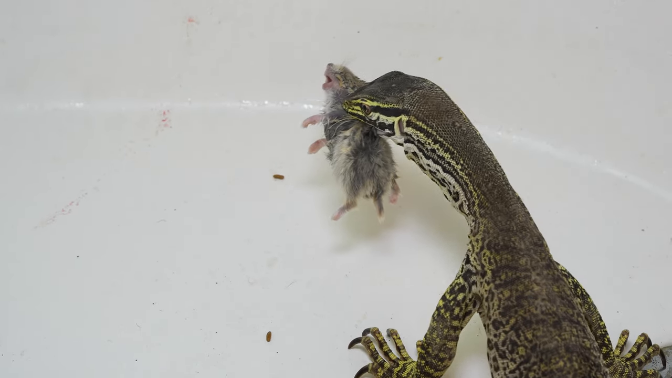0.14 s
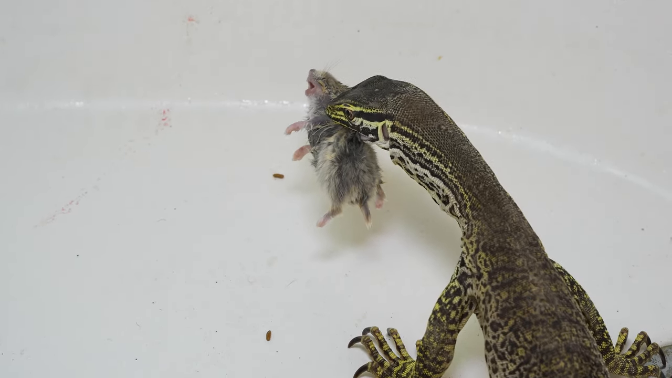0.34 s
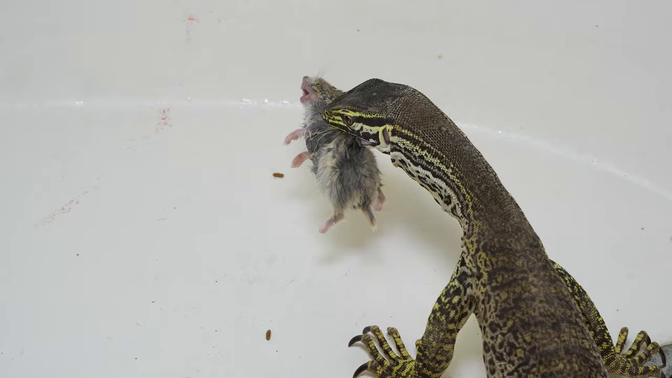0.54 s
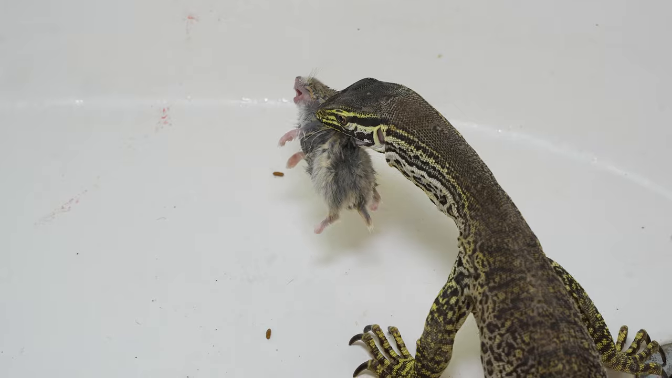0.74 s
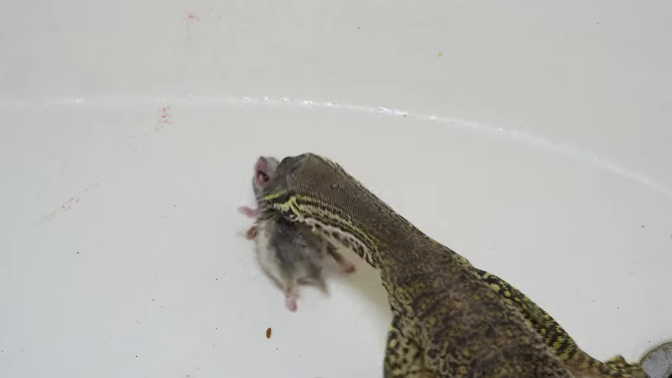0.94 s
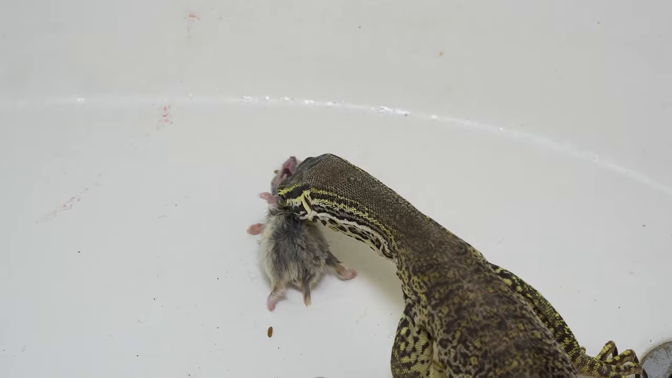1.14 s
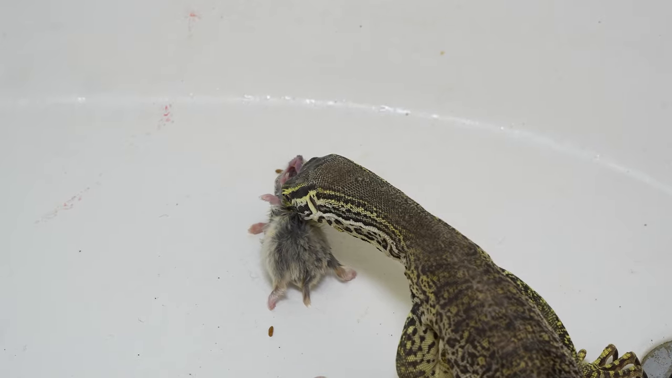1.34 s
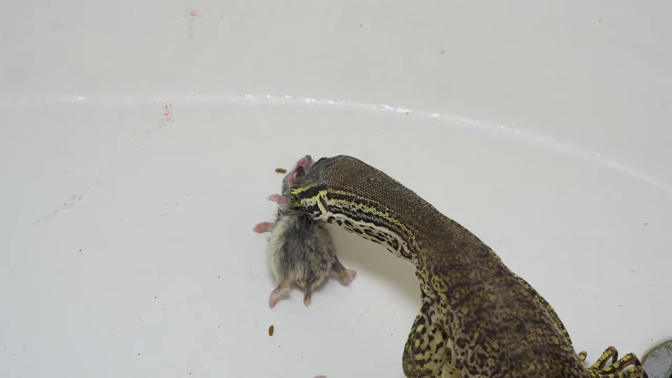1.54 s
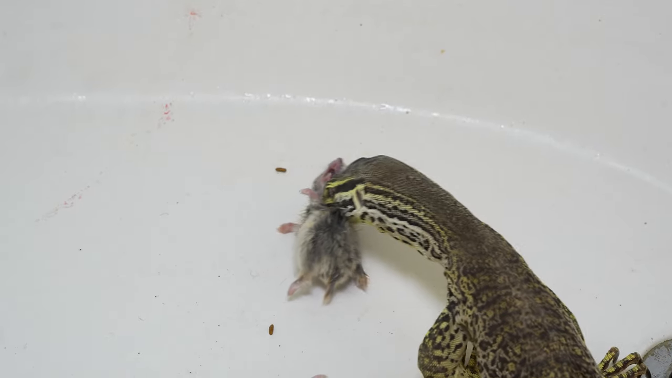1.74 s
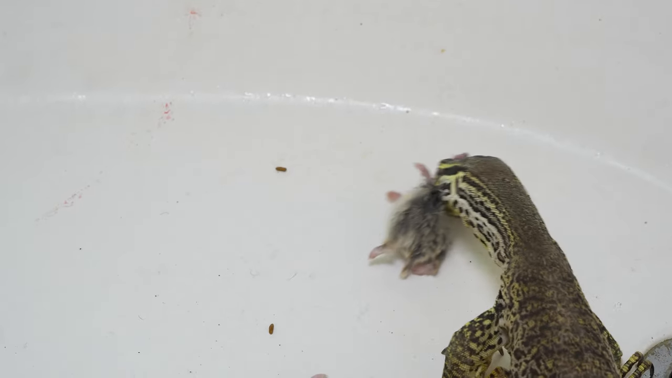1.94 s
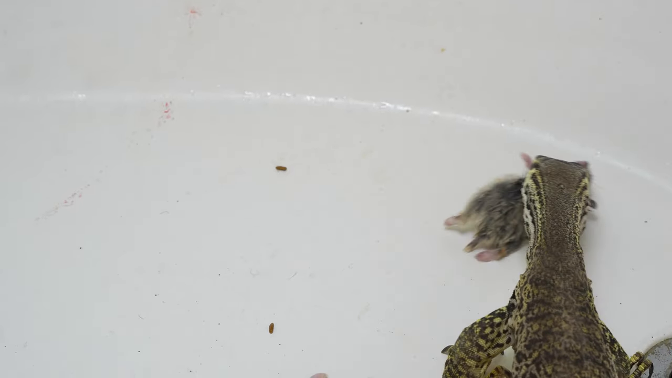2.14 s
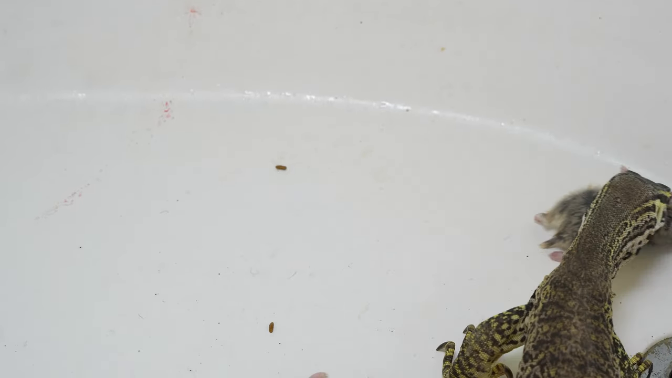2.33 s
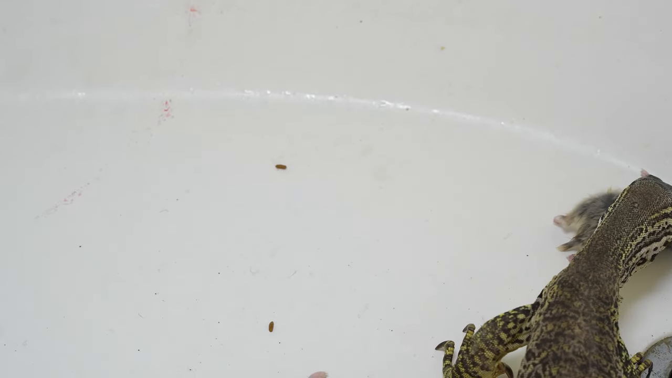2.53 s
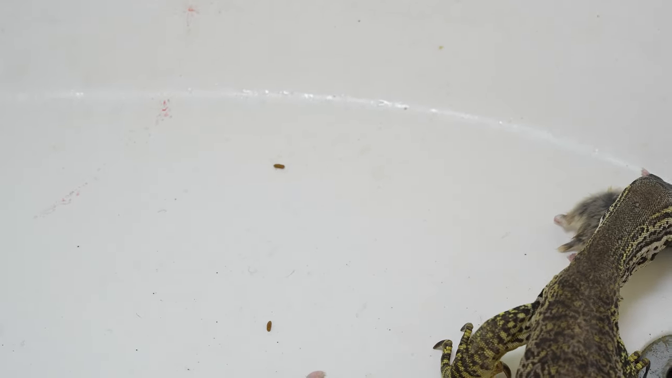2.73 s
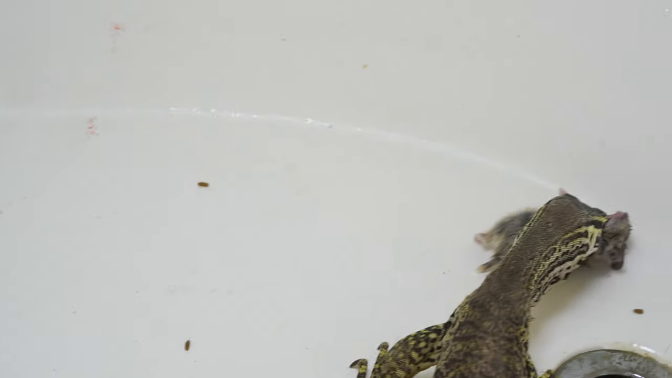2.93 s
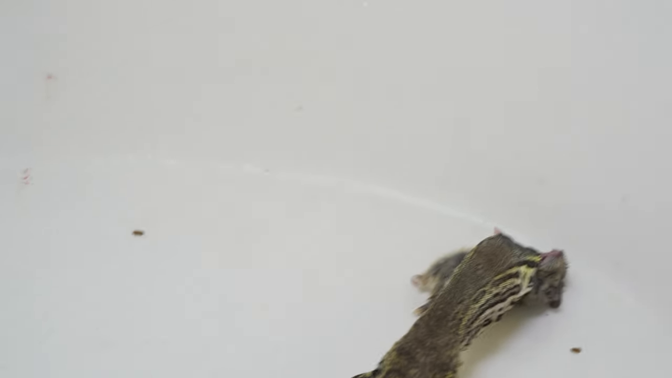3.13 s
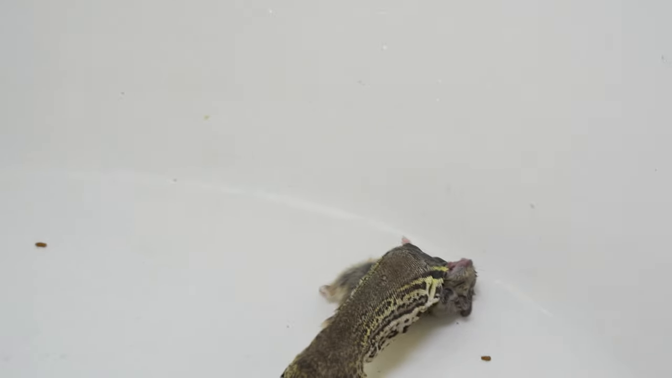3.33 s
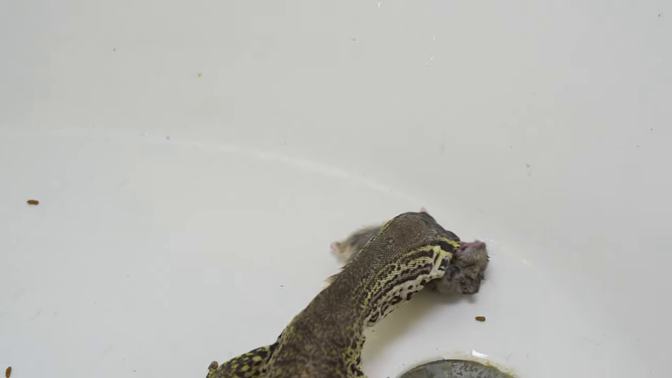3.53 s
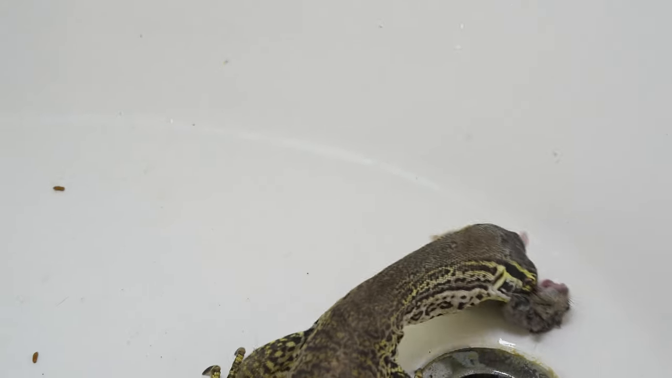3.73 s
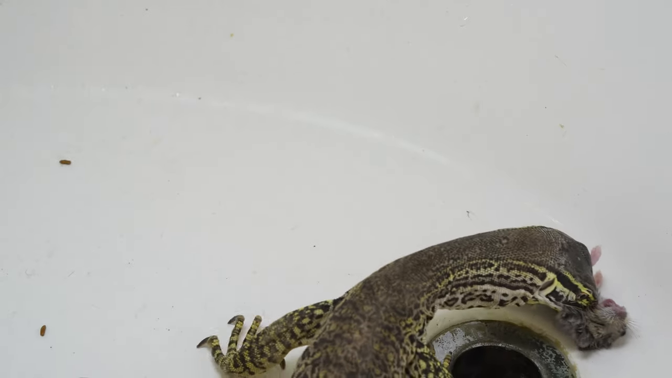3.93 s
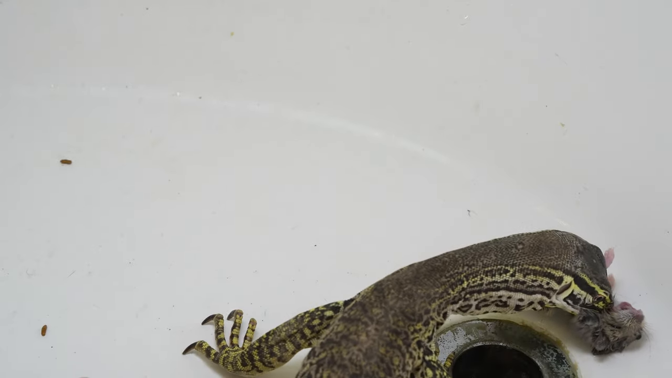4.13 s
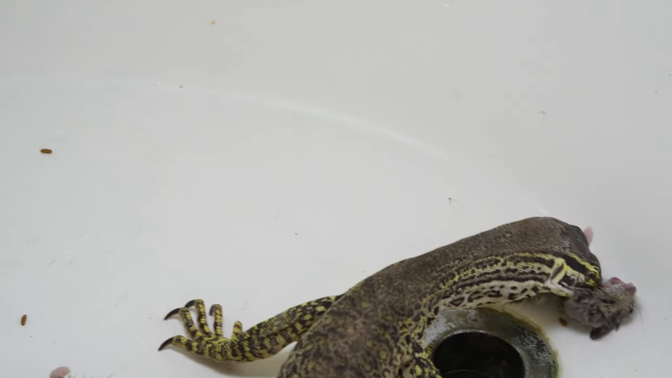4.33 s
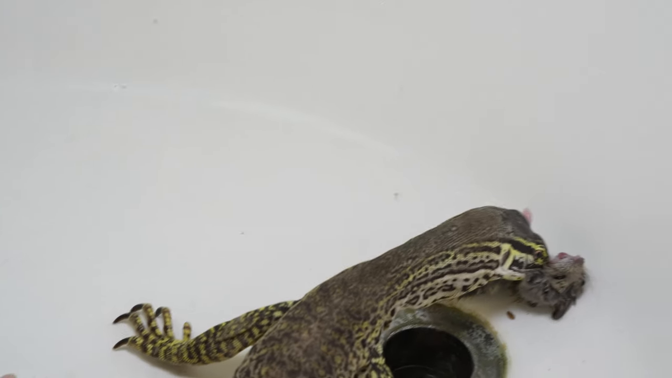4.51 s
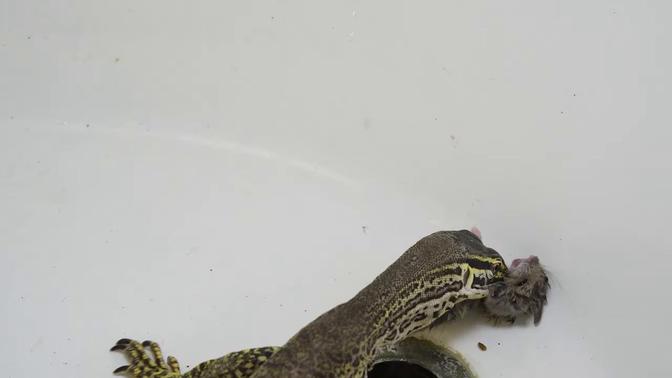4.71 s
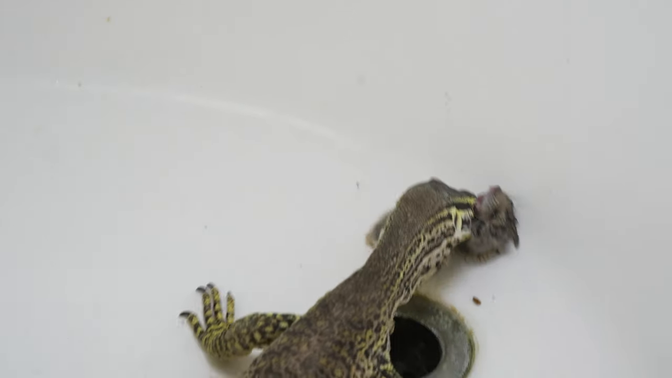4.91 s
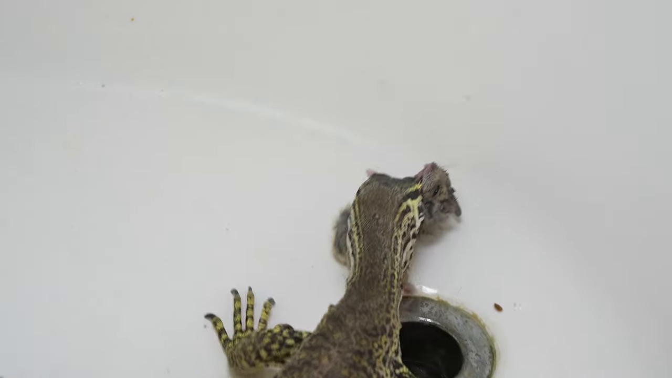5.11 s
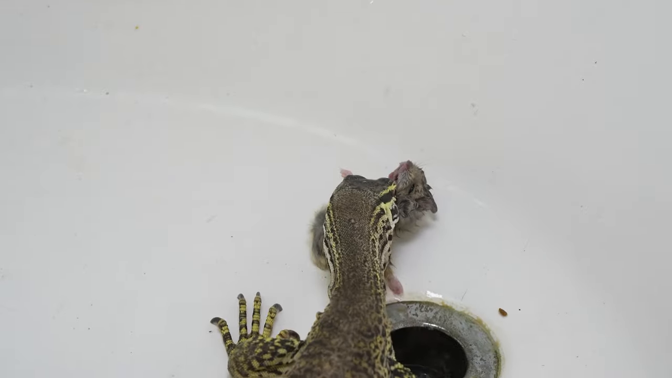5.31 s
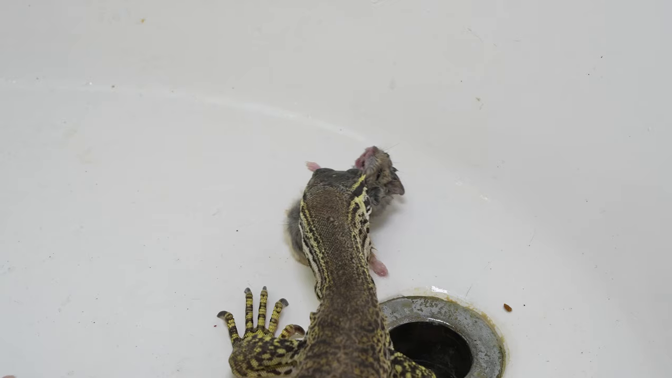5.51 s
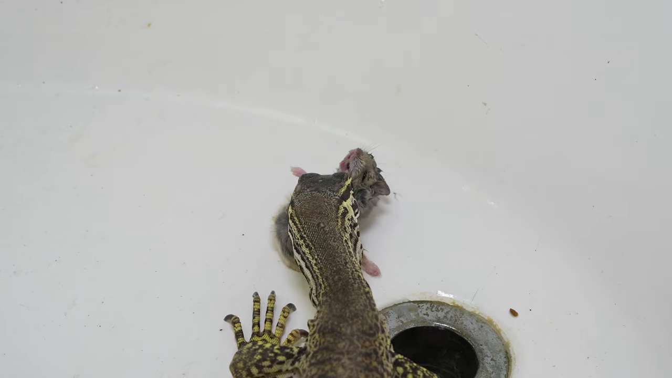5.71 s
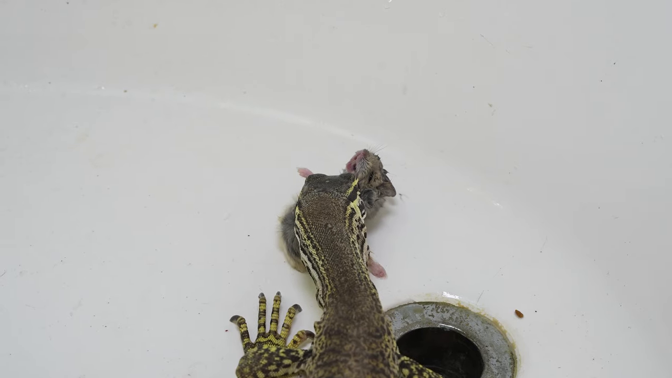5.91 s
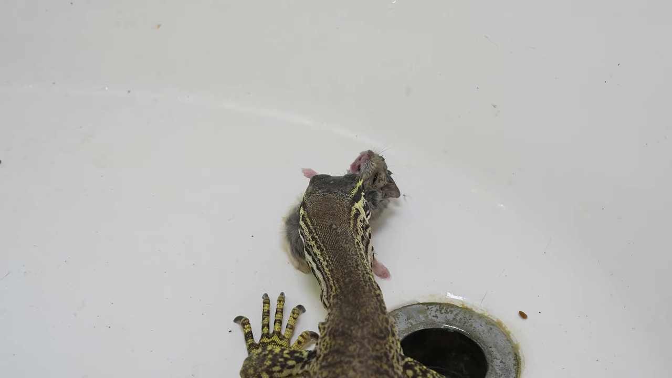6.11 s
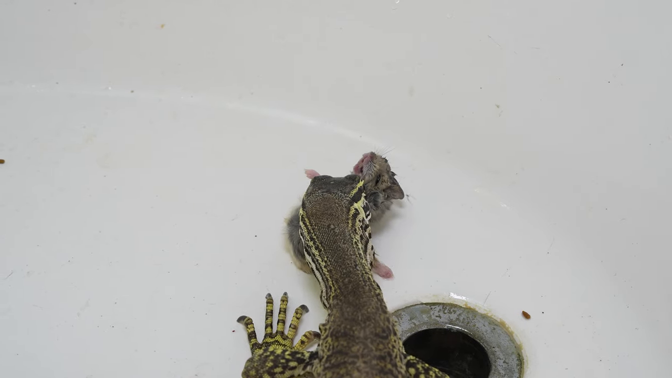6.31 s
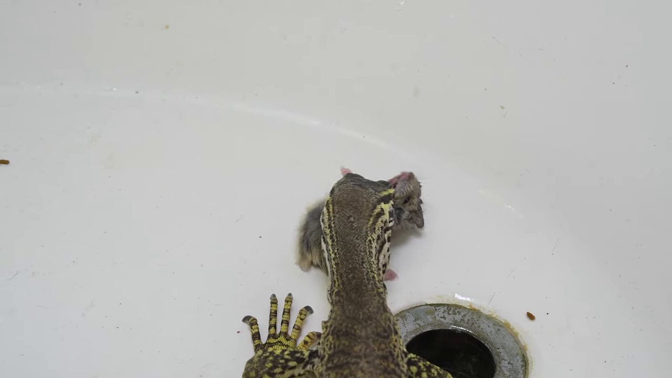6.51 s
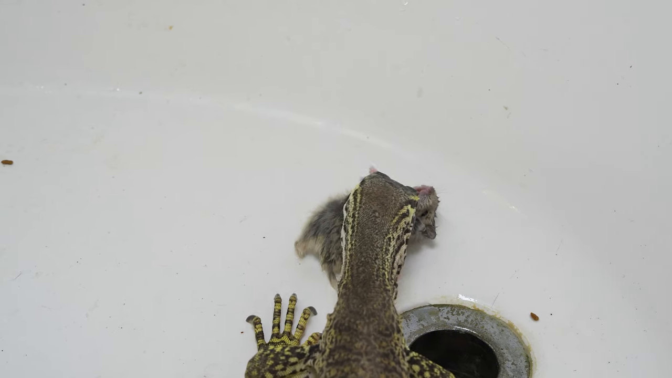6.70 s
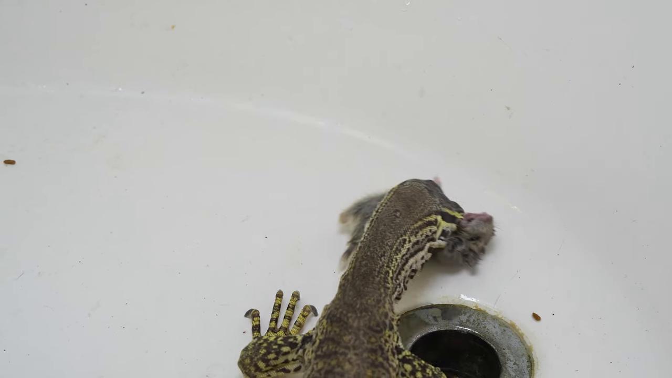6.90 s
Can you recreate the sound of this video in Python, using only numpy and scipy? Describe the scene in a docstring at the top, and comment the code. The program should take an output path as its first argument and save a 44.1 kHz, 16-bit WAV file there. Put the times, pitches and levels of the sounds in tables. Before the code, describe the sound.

A large lizard moves in an empty bathtub, close to the microphone, with the short reverberation of a small hard room and faint low room noise. It begins with a few soft taps. Around 0.9 seconds a foot skids on the enamel, with a sharp claw snap and a dull thud. Another snap comes at 1.9 seconds. Faint taps and light rubbing of scales follow. At 3.8 seconds the body knocks the tub with a hard clack and a hollow boom, by far the loudest event. From 3.9 to 4.3 seconds claws catch on the metal drain in several bright, briefly ringing ticks. The belly then slides along the floor until about 5.3 seconds, hissing and rumbling, with a stronger shove at 4.6, a faint metallic scrape, and a sharp click at 4.9. Only faint taps and rubbing remain until the end, at about 7 seconds.

```python
"""Lizard in an empty bathtub

A large lizard with prey in its jaws shifts about, close to the microphone. Stick-slip friction makes
its feet skid and snap on the enamel and its belly hiss along the floor. Impacts excite resonances:
its body knocks the shell of the tub into booming, and its claws ring the metal drain.
The tub walls and a small hard room reverberate, over faint room noise."""
import sys
import numpy as np
from scipy import signal
from scipy.fft import rfft, irfft, next_fast_len
from scipy.io import wavfile

SR = 44100
rng = np.random.default_rng(int(sys.argv[2]) if len(sys.argv) > 2 else 0)


def log_audio(samples):
    """Write samples as a 16-bit WAV file to the path given in sys.argv[1]."""
    # one column per channel
    frames = np.atleast_2d(samples).T
    # limit to full scale, then quantise
    limited = np.clip(frames, -1, 1)
    pcm = np.round(limited * 32767).astype(np.int16)
    wavfile.write(sys.argv[1], SR, pcm)


N = 311065
T = np.arange(int(.7 * SR)) / SR  # time axis of one impact [s]


def amp(db):
    return 10 ** (np.asarray(db) / 20)


def unit(x):
    return x / np.sqrt(np.mean(x ** 2) + 1e-20)


def add(track, s, x):
    """Superposition: x joins the track from time s on."""
    start = round(s * SR)
    track[start:start + len(x)] += x[:N - start]


def fade(t60):
    """Exponential damping by 60 dB in t60 seconds."""
    return np.exp(-np.log(1000) * T / max(t60, 1e-4))


def stroke(s, hold, db, rise, release):
    """Exponential growth until time s, a hold, then decay; rise and release are seconds per 60 dB."""
    t = np.arange(N) / SR - s
    below = np.maximum(-t, 0) / max(rise, 1e-3) + np.maximum(t - hold, 0) / max(release, 1e-3)
    return amp(db) * np.exp(-np.log(1000) * below)


def swell(s, length, db):
    """Flattened half-sine envelope of a move that gathers speed and comes to rest."""
    progress = np.clip((np.arange(N) / SR - s) / length, 0, 1)
    return amp(db) * np.abs(np.sin(np.pi * progress)) ** 0.59


def filtered(x, response):
    """Linear filtering: the spectrum of x times a complex frequency response."""
    size = 2 * next_fast_len(len(x) // 2 + 8192)
    return irfft(rfft(x, size) * response(np.fft.rfftfreq(size, 1 / SR)), size)[:len(x)]


def shaped(drive, response):
    """Filtering at constant energy."""
    x = filtered(drive, response)
    return x * np.linalg.norm(drive) / np.linalg.norm(x)


def colour(points):
    """Minimum-phase response through points of (frequency [Hz], gain [dB])."""
    def response(hz):
        point_hz, db = np.transpose(points)
        gain = amp(np.interp(np.log(hz + 1), np.log(point_hz), db))
        cepstrum = irfft(np.log(gain))
        half = len(cepstrum) // 2
        return np.exp(rfft(np.r_[cepstrum[0], 2 * cepstrum[1:half], np.zeros(half)]))
    return response


def resonances(peaks):
    """Damped resonators in parallel, each (frequency [Hz], bandwidth [Hz], gain [dB])."""
    return lambda hz: sum(amp(db) * 1j * hz * width / (centre ** 2 - hz ** 2 + 1j * hz * width)
                          for centre, width, db in peaks)


def burst(t60):
    """Broadband excitation by a dying cluster of tiny slips."""
    return .5 * rng.standard_normal(len(T)) * fade(t60)


def friction(rate, smooth):
    """Stick-slip friction: random catches, rate times a second, over a smooth rub; rms 1."""
    catches = rng.standard_normal(N) * (rng.random(N) < rate / SR)
    return unit(unit(catches) + smooth * rng.standard_normal(N))


def diffuse(drive, walls_db, room_db):
    """Diffuse reverberation as noise that trails the drive's power: the tub briefly, the room longer."""
    walls = (fade(.07) * (1 - np.exp(-T / 0.0016))) ** 2
    room = (fade(.44) * (1 - np.exp(-T / 0.021))) ** 2
    energy_response = amp(walls_db) ** 2 * walls / walls.sum() + amp(room_db) ** 2 * room / room.sum()
    power = np.abs(signal.fftconvolve(drive ** 2, energy_response)[:len(drive)])
    return drive + np.sqrt(power) * rng.standard_normal(len(drive))


# spectrum of the room's background: (frequency [Hz], gain [dB])
ROOM_SPECTRUM = [(15, -41), (25, -3), (75, -9), (233, -3.5), (281, -8), (322, -2), (389, -6.5), (648, -11),
                 (1110, -17), (1340, -18.5), (4870, -25), (15500, -30.5)]
def room_noise():
    """Stationary noise, faint and strongest in the bass."""
    return amp(-66.5) * unit(filtered(rng.standard_normal(N), colour(ROOM_SPECTRUM)))


# small contacts of scales and jaws: (time [s], level [dB])
CLICKS = [(0.0268, -56), (0.8, -54), (4.2303, -37.5), (4.901, -28), (6.7149, -50.5)]
# their spectrum: (frequency [Hz], gain [dB])
CLICK_SPECTRUM = [(300, -20), (1800, 1), (2800, -2), (4400, 6), (6500, -9.5), (15000, -49)]
def clicks():
    """Brief, light contacts radiate mostly treble; fainter ones fall at random times."""
    out = np.zeros(N)
    for s, db in CLICKS:
        add(out, s, amp(db) * diffuse(burst(t60=0.0094), walls_db=1, room_db=1))
    faint_per_s = .8
    onsets = 1. * (rng.random(N) < faint_per_s / SR)
    faint = signal.fftconvolve(onsets, burst(t60=0.016))[:N]
    out += amp(-59) * diffuse(faint, walls_db=-8, room_db=-2)
    return shaped(out, colour(CLICK_SPECTRUM))


# soft contacts of feet and prey with the tub: (time [s], level [dB], pitch [Hz])
TAPS = [(0.047, -49.5, 1280), (.057, -46, 550), (0.13, -53, 1020), (1.733, -50.5, 442), (2.247, -44, 445),
        (3.097, -47, 209), (3.47, -45, 430), (3.56, -48.5, 463), (3.69, -44, 1300), (5.815, -47.5, 470),
        (6.88, -52, 430)]
def taps():
    """Damped vibration: each soft tap rings the tub briefly at its own listed pitch."""
    out = np.zeros(N)
    press_s, ring_cycles = 0.00062, 25  # time constant of soft flesh; cycles per 60 dB of decay
    press = 1 - np.exp(-T / press_s)
    for s, db, pitch_hz in TAPS:
        drive = diffuse(press * burst(t60=0.04), walls_db=-3, room_db=-4)
        scuff = shaped(drive, resonances([(pitch_hz, .3 * pitch_hz, 0)]))
        ring = press * np.sin(2 * np.pi * pitch_hz * T) * fade(ring_cycles / pitch_hz)
        add(out, s, amp(db) * (scuff + amp(-9.5) * ring))
    return out


# low modes of the tub: (frequency [Hz], level [dB], 60 dB decay time [s])
SHELL_MODES = [(64.6, -6.5, 0.43), (98.2, -2.5, 0.46), (109.2, -5.5, 0.55), (182.2, -5.5, 0.34),
               (251.7, -15, 0.33), (336, -10.5, 0.325), (365, -18, 0.43), (433, -19, 0.84),
               (585, -16, 0.15), (705, -17.5, 0.32), (732, -27, 1), (936, -20.5, 0.6)]
def shell():
    """Modal superposition: the tub's impulse response, with mode strengths varied at each call."""
    return sum(amp(db + 1.5 * rng.normal()) * np.sin(2 * np.pi * hz * T) * fade(t60)
               for hz, db, t60 in SHELL_MODES)


# quick slides of scaly feet: (time [s], hold [s], level [dB], 60 dB release time [s])
SKIDS = [(.843, 0.028, -41.5, .17), (0.952, .003, -47, 0.31), (4.241, 0.012, -61, 0.051),
         (4.257, 0.0026, -43, 0.048)]
# sharp slips of a claw: (time [s], level [dB], 60 dB decay time [s])
SNAPS = [(0.924, -25.5, 0.015), (1.039, -42, 0.021), (1.8838, -26, 0.017), (3.463, -44.5, 0.029),
         (3.484, -48, 0.011), (3.673, -37, 0.0081)]
# spectrum of rubbed enamel: (frequency [Hz], gain [dB])
ENAMEL_SPECTRUM = [(40, -14), (200, 1), (450, 6), (900, 1), (1800, -3), (3500, 0), (5500, 1), (7500, -4),
                   (10000, -9.5), (15500, -22.5)]
def skids():
    """Stick-slip of feet and claws drives the shell; interference with one reflection combs the rasp."""
    effort = sum(stroke(s, hold, db, rise=0.062, release=release) for s, hold, db, release in SKIDS)
    rasp = diffuse(effort * friction(rate=3500, smooth=0.96), walls_db=-7, room_db=-5)
    for s, db, t60 in SNAPS:
        add(rasp, s, amp(db) * diffuse(burst(t60), walls_db=0.5, room_db=-1.5))
    echo_s = .0019
    comb = lambda hz: 1 + amp(-24.5) * np.exp(-2j * np.pi * hz * echo_s)
    modes = shell()
    boom = signal.fftconvolve(rasp, modes / np.linalg.norm(modes))[:N]
    return shaped(rasp, lambda hz: colour(ENAMEL_SPECTRUM)(hz) * comb(hz)) + amp(-17) * boom


# spectrum of the flank meeting the tub: (frequency [Hz], gain [dB])
BUMP_SPECTRUM = [(40, -8), (65, 3), (110, -5), (160, -2), (260, 7.5), (350, -7), (600, 2), (1200, -10),
                 (4000, -48)]
def bump():
    """A compliant impact carries little treble: the flank settles with a dull thud."""
    out = np.zeros(N)
    add(out, s=.921, x=amp(-36) * shaped(burst(t60=0.46), colour(BUMP_SPECTRUM)))
    return out


# slow shifts of the body: (time [s], duration [s], level [dB])
CREEPS = [(1.578, 0.44, -70), (2.795, .86, -65.5), (3.626, 0.2, -67), (5.28, .47, -69.5),
          (6.73, 0.31, -68.5)]
# spectrum of lightly sliding scales: (frequency [Hz], gain [dB])
CREEP_SPECTRUM = [(200, 11), (400, -2.5), (900, -2.5), (3300, 1), (6500, -3.5), (10000, -13), (15500, -19)]
# spectrum of the moving weight: (frequency [Hz], gain [dB])
RUMBLE_SPECTRUM = [(25, -14.5), (65, 1), (120, -0.5), (200, -0.5), (290, -15), (380, -7), (700, -26.5),
                   (4000, -74)]
def creeps():
    """Sliding friction under light load gives an airy hiss and a trace of rumble."""
    hiss = unit(filtered(friction(rate=4000, smooth=2.2), colour(CREEP_SPECTRUM)))
    rumble = unit(filtered(rng.standard_normal(N), colour(RUMBLE_SPECTRUM)))
    return sum(swell(*move) for move in CREEPS) * (hiss + amp(-9) * rumble)


# resonance of the hand-held microphone: (frequency [Hz], bandwidth [Hz], gain [dB])
GRIP_RESONANCE = [(33, 4.7, 0)]
def handling():
    """Structure-borne noise: a deep, faint rumble as the microphone is shifted."""
    rumble = unit(filtered(rng.standard_normal(N), resonances(GRIP_RESONANCE)))
    return swell(s=2.37, length=1, db=-66) * rumble


# shoves of the belly along the floor: (time [s], hold [s], friction level [dB], rumble level [dB])
DRAGS = [(2.77, 0.0073, -56, -53.5), (4.318, 0.093, -69.5, -54), (4.575, 0.038, -44, -36),
         (4.899, 0.069, -49.5, -44.5), (5.06, 0.018, -86, -56.5)]
# spectrum of scales under load: (frequency [Hz], gain [dB])
SCALE_SPECTRUM = [(100, 1), (400, 6.5), (800, 1), (1200, 1), (1700, 3), (2000, -3), (2550, 4), (3200, -1.5),
                  (4000, 0.5), (5200, -4), (6500, -13.5), (10000, -19.5), (15500, -49)]
# resonances of the tub floor: (frequency [Hz], bandwidth [Hz], gain [dB])
FLOOR_MODES = [(1615, 53, -3.5), (2685, 22, 0.5), (3010, 86, -2.5), (3330, 58, -3), (3770, 46, 4),
               (4250, 49, -6), (4750, 140, 0.5)]
def drags():
    """Forced vibration: rubbing scales hiss and ring the floor; the dragged weight judders the shell."""
    glide = swell(s=4.084, length=1.27, db=-61)  # the belly keeps sliding between shoves
    speed = glide + sum(stroke(s, hold, db, rise=0.18, release=0.3) for s, hold, db, _ in DRAGS)
    lag_s = 0.012
    weight = sum(stroke(s + lag_s, hold, db, rise=0.26, release=.36) for s, hold, _, db in DRAGS)
    rub = diffuse(speed * friction(rate=1800, smooth=1), walls_db=-1, room_db=-14.5)
    judder = unit(filtered(friction(rate=900, smooth=0.53), colour(RUMBLE_SPECTRUM)))
    boom = unit(signal.fftconvolve(friction(rate=1000, smooth=0.99), shell())[:N])
    hiss = amp(-4.5) * shaped(rub, colour(SCALE_SPECTRUM))
    ring = amp(-14) * shaped(rub, resonances(FLOOR_MODES))
    return hiss + ring + weight * (amp(-4) * judder + amp(-6.5) * boom)


# quick contacts of the body with the tub: (time [s], clack level [dB], boom level [dB])
KNOCKS = [(3.7909, -15.5, -28), (3.7986, -17.5, -44), (3.8055, -28, -28)]
# spectrum of the hard contact: (frequency [Hz], gain [dB])
CLACK_SPECTRUM = [(60, -4), (300, 4.5), (700, -0.5), (1100, -1.5), (1650, 2), (2000, -8.5), (2500, -14),
                  (3200, 4.5), (3800, -13.5), (4900, -21), (6200, -29), (15000, -60.5)]
# resonances of the stiff enamelled wall: (frequency [Hz], bandwidth [Hz], gain [dB])
WALL_MODES = [(1360, 40, -25), (1570, 110, -1), (1635, 125, -1), (1740, 59, -17), (2990, 77, -8),
              (3116, 40, -3), (3273, 140, 2), (4810, 120, -8.5)]
# spectrum of the weight landing: (frequency [Hz], gain [dB])
THUD_SPECTRUM = [(35, -19), (60, -6.5), (100, 0), (150, -12), (190, -16), (290, -18.5), (345, -12),
                 (800, -21), (4000, -100)]
def knock():
    """Impact excitation: hard contacts clack and ring the wall; the weight thuds and booms the shell."""
    out = np.zeros(N)
    wall = lambda hz: resonances(WALL_MODES)(hz) / (1 + (hz / 5500) ** 8)
    for s, clack_db, boom_db in KNOCKS:
        drive = diffuse(burst(t60=0.032), walls_db=-9, room_db=-4.5)
        clack = shaped(drive, colour(CLACK_SPECTRUM)) + amp(-2.5) * shaped(drive, wall)
        thud = shaped(burst(t60=0.25), colour(THUD_SPECTRUM))
        add(out, s, amp(clack_db) * clack + amp(boom_db) * (shell() + amp(9) * thud))
    return out


# resonances of the metal drain ring: (frequency [Hz], bandwidth [Hz], gain [dB])
DRAIN_MODES = [(5430, 250, -14), (5550, 54, 10.5), (6700, 170, -20), (6900, 140, -12), (8100, 110, -21),
               (10200, 240, -4.5)]
def drain_ring(hz):
    """Modal response of the drain ring, rolled off above 11 kHz."""
    return resonances(DRAIN_MODES)(hz) / (1 + (hz / 11000) ** 8)


# catches of a claw on the drain ring: (time [s], level [dB], 60 dB decay time [s])
CLAW_CATCHES = [(3.925, -42, 0.071), (3.947, -33, 0.024), (3.999, -29.5, 0.021), (4.013, -28.5, 0.024),
                (4.2488, -33, 0.032), (4.2575, -30, 0.018)]
# spectrum of claw on metal: (frequency [Hz], gain [dB])
SCRATCH_SPECTRUM = [(200, -2), (3000, -14.5), (5500, -5.5), (7000, -4), (8600, -9), (9200, -29),
                    (12000, -26), (15500, -33)]
# resonances of the hollow under the drain: (frequency [Hz], bandwidth [Hz], gain [dB])
PIPE_MODES = [(449, 84, -10.5), (540, 61, -5.5), (955, 160, -10.5)]
def claw_catches():
    """Each catch excites resonance in the drain ring and its pipe; harder ones add more scratch."""
    out = np.zeros(N)
    for s, db, t60 in CLAW_CATCHES:
        drive = lambda: diffuse(burst(t60), walls_db=-3.5, room_db=-6.5)
        scratch = amp(0.4 * (db + 29)) * shaped(drive(), colour(SCRATCH_SPECTRUM))
        ring = amp(-7) * shaped(drive(), drain_ring)
        hollow = amp(-16) * shaped(burst(t60=0.29), lambda hz: resonances(PIPE_MODES)(hz) ** 2)
        add(out, s, amp(db) * (scratch + ring + hollow))
    return out


def claw_scrape():
    """Stick-slip excitation: a claw drawn along the drain catches repeatedly, ringing the metal."""
    effort = stroke(s=4.765, hold=0.063, db=-59, rise=0.46, release=.2)
    slips = effort * friction(rate=260, smooth=0.34)
    drive = lambda: diffuse(slips, walls_db=-0.5, room_db=-3)
    return amp(-3.5) * shaped(drive(), drain_ring) + shaped(drive(), colour(SCRATCH_SPECTRUM))


def scene():
    """Superposition of all sources at one microphone."""
    hits = knock() + bump() + taps() + clicks() + claw_catches()
    slides = skids() + claw_scrape() + drags() + creeps()
    return (hits + slides + handling() + room_noise())[None]


def record(dry):
    """Band limiting: the microphone is a second-order high-pass with a sharp upper cutoff."""
    corner_hz, top_hz = 38, 15850
    high_pass = lambda hz: (1j * hz) ** 2 / (corner_hz ** 2 - hz ** 2 + 1j * hz * corner_hz)
    return np.array([filtered(x, lambda hz: high_pass(hz) * (hz < top_hz)) for x in dry])


dry = scene()
out = record(dry)
log_audio(out)
```